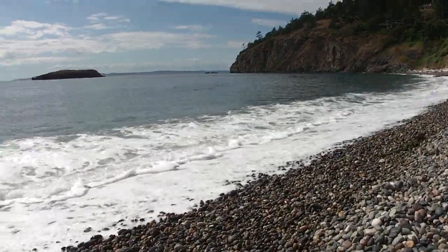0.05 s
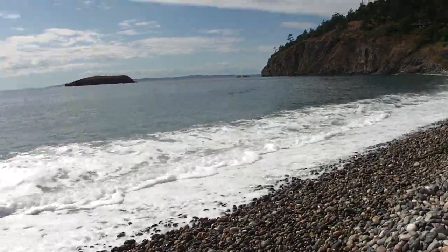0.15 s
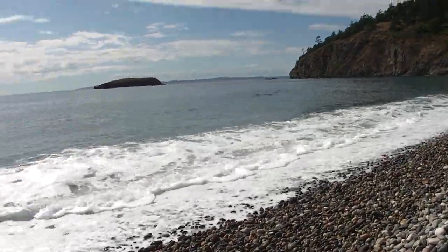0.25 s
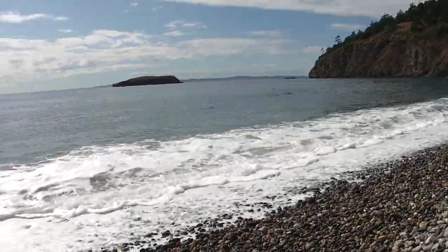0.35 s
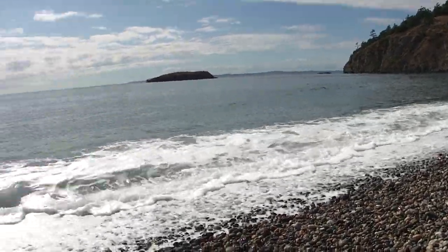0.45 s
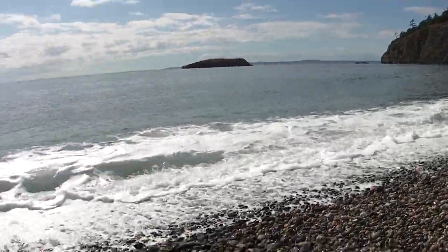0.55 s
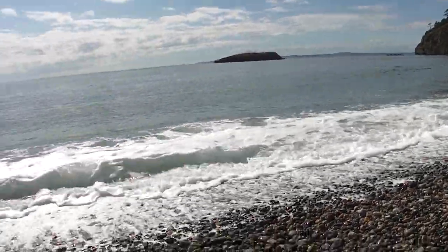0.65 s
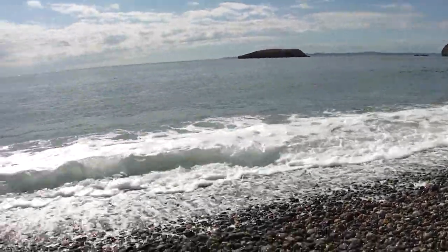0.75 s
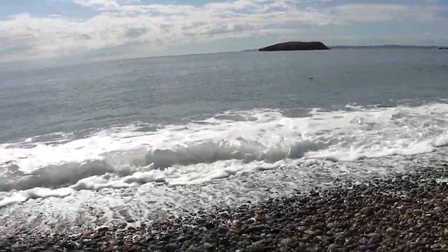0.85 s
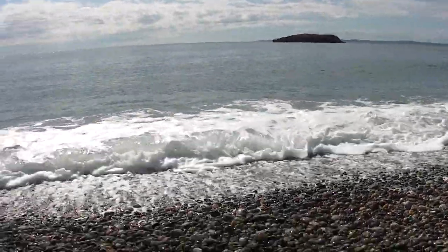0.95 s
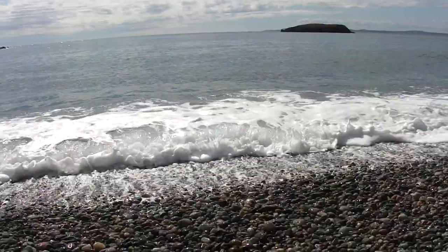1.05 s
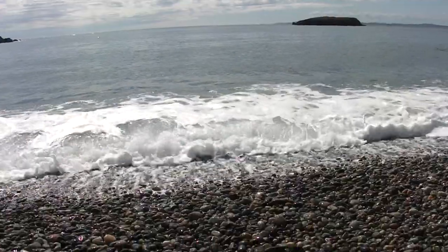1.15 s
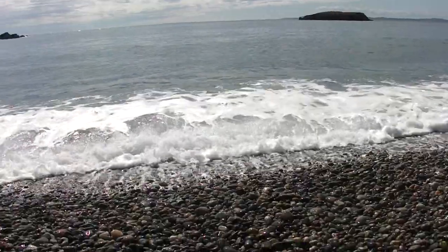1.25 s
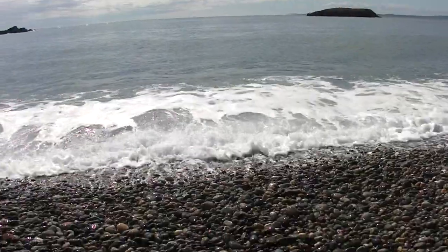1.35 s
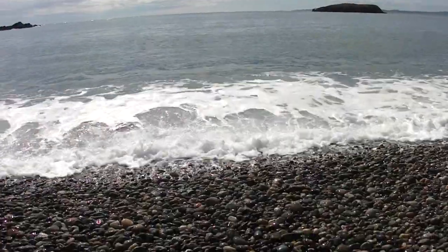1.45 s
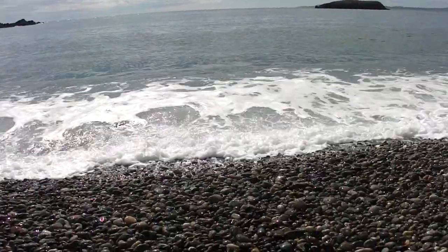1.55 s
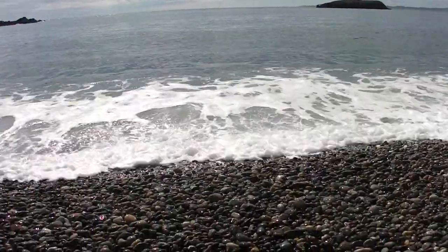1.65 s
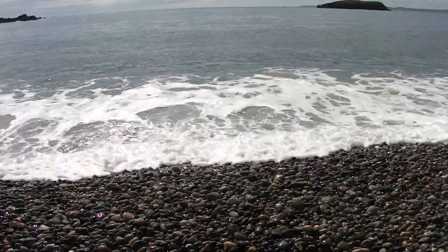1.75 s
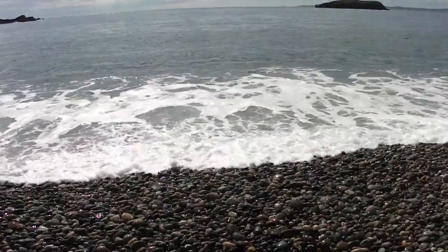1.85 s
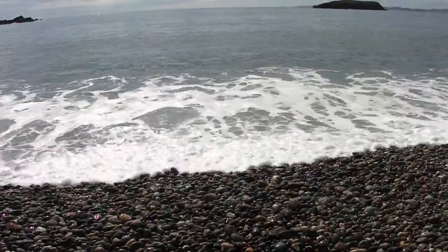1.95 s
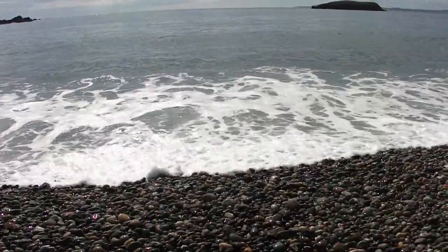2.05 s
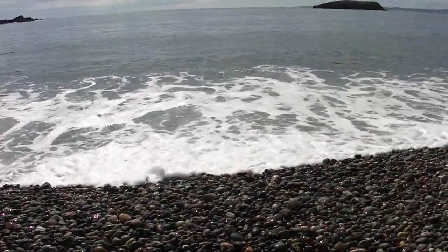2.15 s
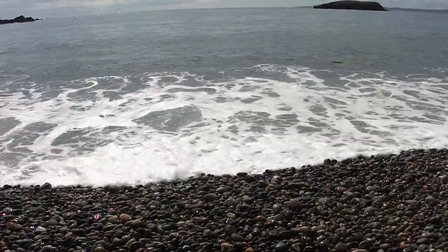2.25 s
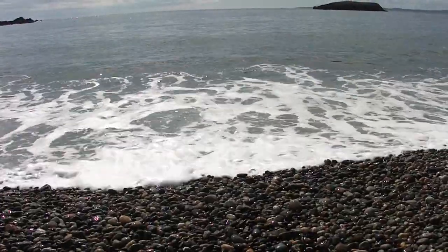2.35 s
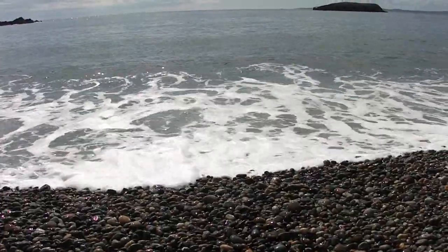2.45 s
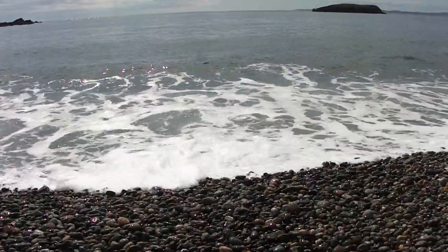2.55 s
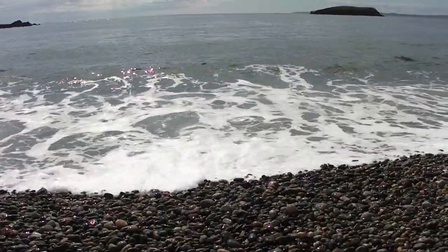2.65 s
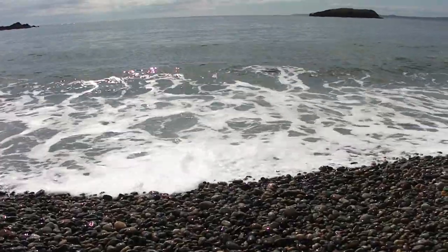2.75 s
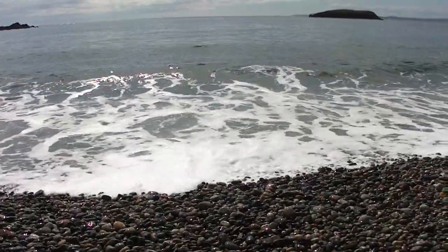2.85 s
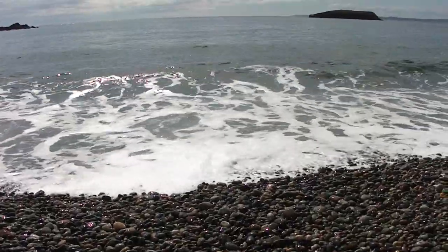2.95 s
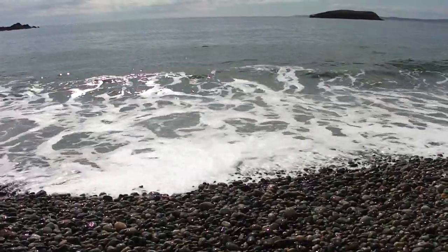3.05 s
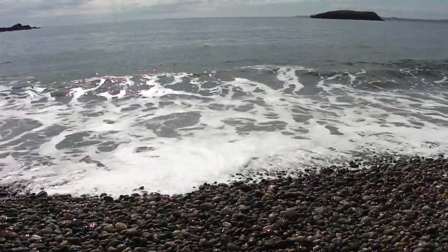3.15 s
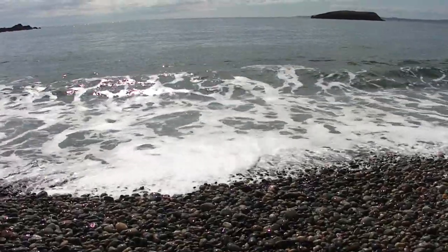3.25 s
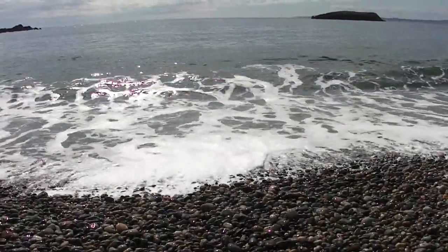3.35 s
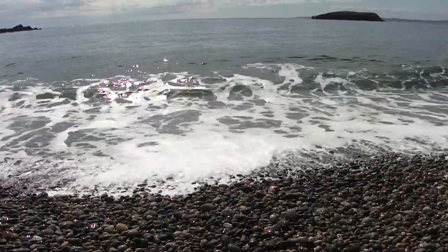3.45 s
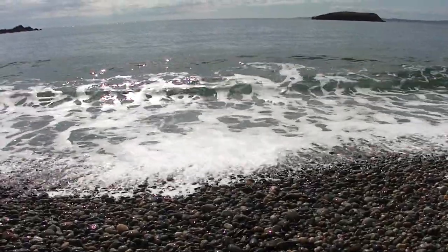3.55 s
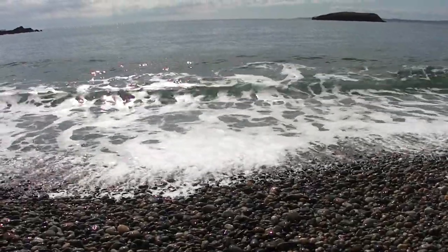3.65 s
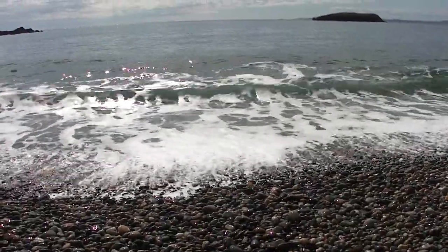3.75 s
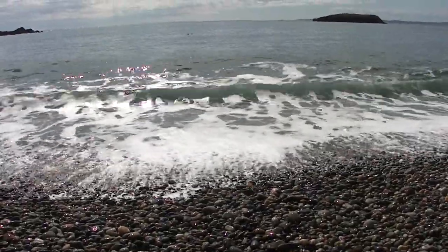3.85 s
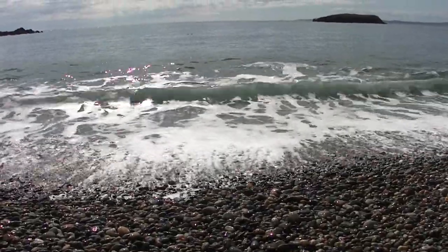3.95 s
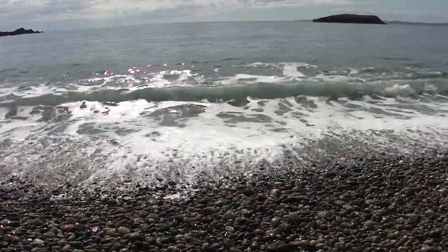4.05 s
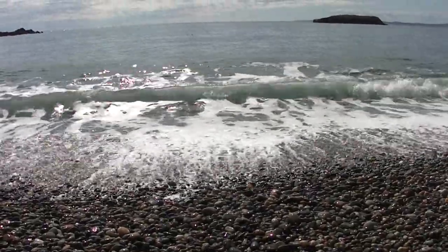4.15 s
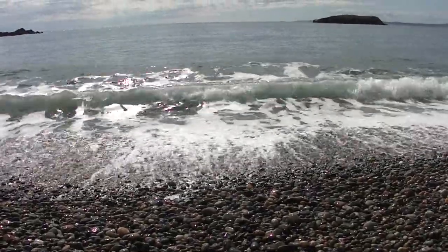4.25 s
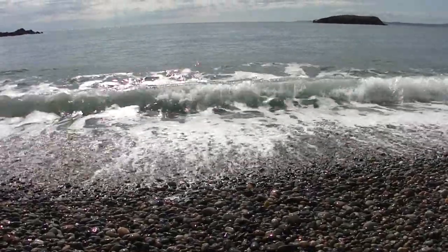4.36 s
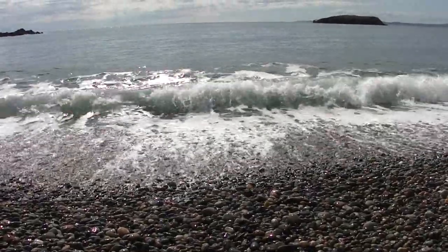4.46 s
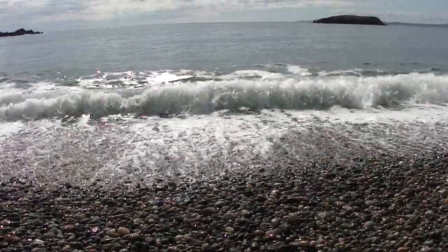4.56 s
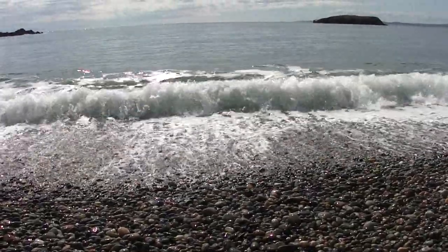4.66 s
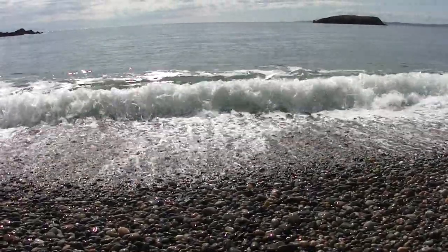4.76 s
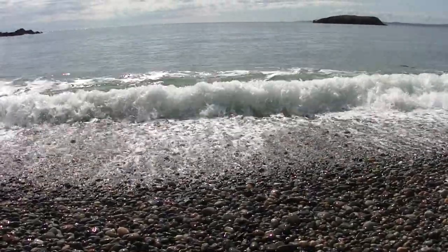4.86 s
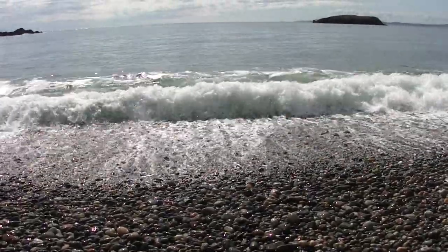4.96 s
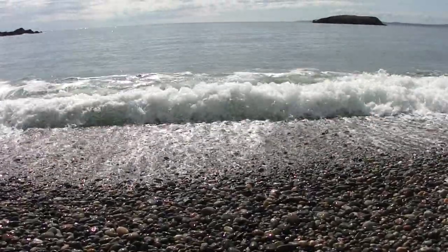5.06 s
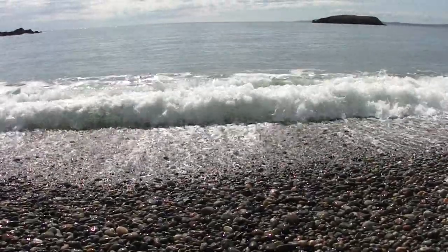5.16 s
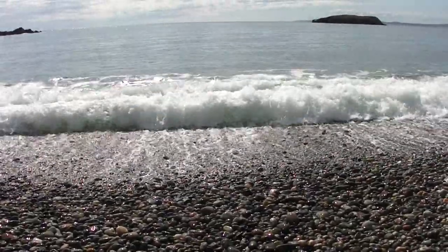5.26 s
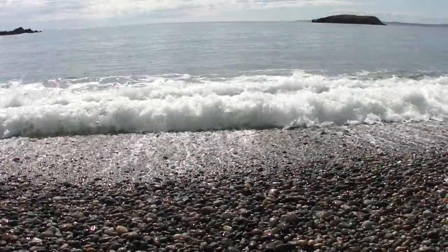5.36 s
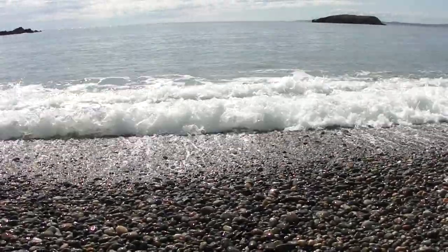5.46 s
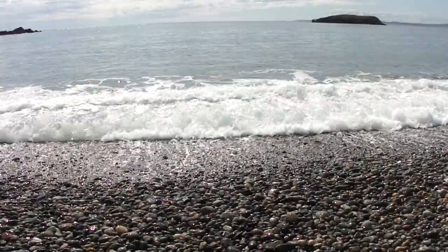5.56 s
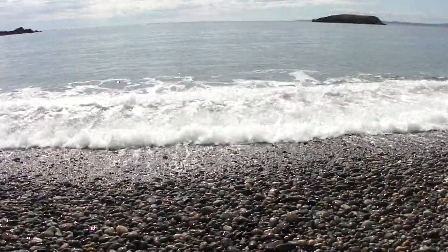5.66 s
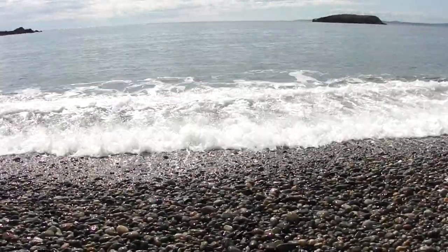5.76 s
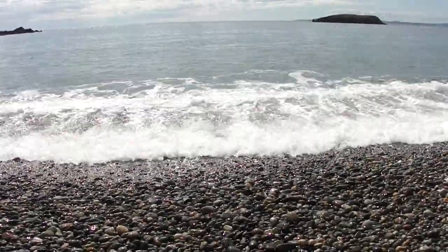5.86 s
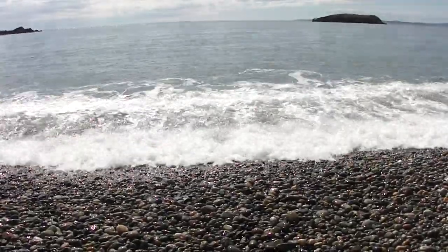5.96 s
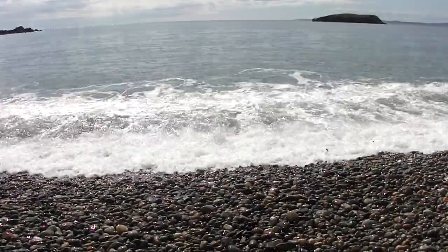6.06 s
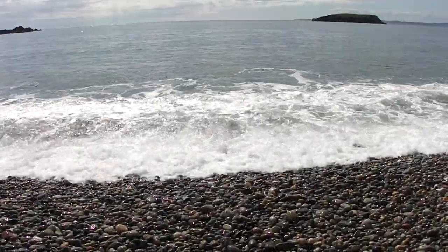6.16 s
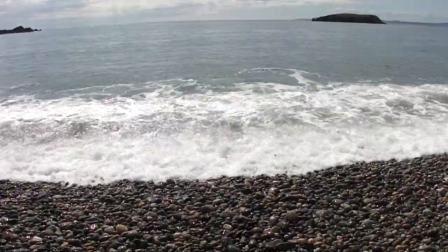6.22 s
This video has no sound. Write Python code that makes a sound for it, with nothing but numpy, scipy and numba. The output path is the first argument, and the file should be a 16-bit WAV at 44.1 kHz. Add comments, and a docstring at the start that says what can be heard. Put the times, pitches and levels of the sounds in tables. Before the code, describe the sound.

Outdoors on a pebble beach, near the waterline, with a small stereo microphone exposed to wind. From 0 to 1.4 s, low irregular gusts thump, flap and slap the microphone, shifting between sides, over a splashy wash and pebbly backwash; a small wave breaks around 1 s and runs up the stones, with a few knocks near 1.27 s. From 1.5 to 3.2 s it fades into thin fizzing foam, faint surf and isolated stone clicks, with only slight wind puffs. Around 3.3-3.45 s stones clack in a quick cluster, and hard wind slaps return until about 4 s as water drags hissing through shingle. At about 4.1 s a bigger wave breaks, bright and splashy, then tumbles in with uneven surges and a fuller gulping roar; two stones knock around 5.3 s. Near 6 s it washes up the pebbles and begins to ease.

```python
"""Gusts thump and slap at two microphone ports while a spent wave washes up a pebble beach and fizzes out;
stones knock in the water, then a last wave breaks and tumbles in. Surf is swarms of damped sines (bubbles,
drops) over filtered noise; stones are short tones and ticks; wind is thumps, noise and single push-pull
pulses, and each port's buffeting leaks inverted into the other channel."""
import sys
import numpy as np
from scipy import signal
from scipy.fft import rfft, irfft, next_fast_len
from scipy.io import wavfile
from scipy.ndimage import uniform_filter1d
from numba import njit

SR = 44100
rng = np.random.default_rng(int(sys.argv[2]) if len(sys.argv) > 2 else 0)


def inscribe(sig):
    """Save sig as 16-bit PCM at rate SR to the path in sys.argv[1].

    A 1-D sig is mono; a 2-D sig holds one channel per row.
    Samples are clipped to [-1, 1] before scaling.
    """
    pcm = np.round(np.clip(np.atleast_2d(sig).T, -1, 1) * 32767)
    wavfile.write(sys.argv[1], SR, pcm.astype(np.int16))


N = 277389
TIME = np.arange(N) / SR
PADDED = next_fast_len(N + SR // 10)
BINS = np.arange(PADDED // 2 + 1) * SR / PADDED  # Hz

# filter of splashing drops and pebble clicks: hz, gain_db
SPLASH_FILTER = [(400, -26), (900, -6.5), (1300, -1.5), (1800, -1), (2300, -2.5), (3000, -7), (4500, -15.5),
                 (8000, -68)]


def surf(roar_gain, splash_gain, spray_gain, hiss_gain,
         slosh_db=0.49, slosh_rate_hz=26, flutter_db=0.6, flutter_rate_hz=13):
    """Big air pockets gulp, bubble clouds roar, drops splash, spray and draining shingle hiss; foam fizzes."""
    # big air pockets against the roar: time_s, level_db
    churn = [(0, -8), (1.0, -1.5), (2.2, -8), (3.7, -4.5), (4.15, -2.5), (5.2, -3.5), (5.9, -8),
             (6.29, -16.5)]
    # fizz lingering on the wet stones: time_s, level_db
    fizz = [(0.8, -54), (1.5, -46), (3.0, -46), (3.6, -50)]
    # layer filters: hz, gain_db
    pocket_filter = [(30, -66), (70, -32), (130, -11.5), (220, -3), (400, 0), (520, 0.5), (750, 0.5),
                     (1400, -33)]
    roar_filter = [(150, -59), (400, -3), (600, -3), (800, 1.5), (1050, -0.5), (1400, -4), (2000, -9.5),
                   (4000, -35)]
    spray_filter = [(1500, -20), (3000, 5.5), (4500, 7), (6000, 5), (7500, -3.5), (9500, -10.5),
                    (11000, -23), (16000, -33)]
    hiss_filter = [(1500, 2), (3000, 5.5), (4500, 5.5), (6000, 4), (7500, -5.5), (9500, -16.5),
                   (16000, -62)]
    foam_filter = [(2000, -26), (4000, 0), (6000, 4.5), (8000, 4.5), (10000, -0.5), (11000, -9),
                   (16000, -8.5)]
    fresh_foam_db, foam_splash_share = -15, 0.13  # relative to roar gain; how far it follows the splash

    churn_db, = curves(churn)
    fizz_db, = curves(fizz)
    fresh_gain = roar_gain * (splash_gain / roar_gain) ** foam_splash_share * undb(fresh_foam_db)
    foam_gain = np.hypot(undb(fizz_db), fresh_gain)

    pockets = water(swarm(1200, 122.5, 895, 5.6, 1.3, 0.072), pocket_filter, blur_db=5.0)
    roar = water(swarm(2200, 416, 1760, 10.9, 2.17, 0.43), roar_filter, blur_db=8.5)
    splash = water(swarm(4000, 1074, 4620, 6.1, 1.8, 0.044), SPLASH_FILTER, blur_db=6.5)
    spray = water(swarm(6000, 3030, 12600, 14.0, 1.8, 0), spray_filter, blur_db=7.0)
    hiss = water(swarm(4000, 3180, 10200, 5.5, 2.8, 0), hiss_filter, blur_db=-0.5)
    foam = water(swarm(3900, 3520, 15500, 27, 1.8, 0.1), foam_filter, blur_db=5.5) * foam_gain

    pockets = pockets * roar_gain * undb(churn_db + 1.0)
    roar = roar * roar_gain * undb(1.0)
    splash = splash * splash_gain * undb(4.5)
    spray = spray * spray_gain * undb(12.0)
    hiss = hiss * hiss_gain * undb(12.0)

    # splash and spray flutter independently; all but the foam sloshes together
    splash = splash * undb(flutter_db * walk(flutter_rate_hz))
    spray = spray * undb(flutter_db * walk(flutter_rate_hz))
    slosh = undb(slosh_db * walk(slosh_rate_hz))
    return (pockets + roar + splash + spray + hiss) * slosh + foam


def sea():
    """Gains of roar, splash, spray, backwash flow and its hiss; powers of all moving water add."""
    # waves, the first already spent; levels before layer trims: breaks_s, run_s, splash_db, roar_db
    waves = [(-0.34, 0.1, -18.5, -34), (0.985, 0.35, -22.5, -29.5), (4.14, 1.84, -21, -18)]
    # crest stretches falling at once; levels before layer trims: lands_s, roar_db, splash_db, spray_db
    surges = [(0.105, -35, -28, -51), (4.085, -30, -32, -42), (4.28, -34, -24, -35), (4.42, -27, -31, -37),
              (4.89, -24, -35, -48), (5.18, -42, -27, -48), (5.84, -22.5, -42, -40), (6.09, -22, -42, -48)]
    # water dragging back through pebbles; before trims: full_flow_s, length_s, splash_db, hiss_db
    drags = [(0.373, 0.32, -27.8, -42), (3.317, 0.11, -35, -39), (3.84, 0.22, -33, -36.5)]
    drag_roar_db = -13  # relative to its splash
    far_roar_db, far_splash_db, far_spray_db = -42, -44, -55  # surf further along the beach

    roar, splash, spray = together([wave(*row) for row in waves] + [surge(*row) for row in surges])
    drag, hiss = together([backwash(*row) for row in drags])
    roar = np.hypot(together([roar, drag * undb(drag_roar_db)]), undb(far_roar_db))
    splash = np.hypot(together([splash, drag]), undb(far_splash_db))
    spray = np.hypot(spray, undb(far_spray_db))
    return roar, splash, spray, drag, hiss


def wave(breaks_s, run_s, splash_db, roar_db):
    """Gains of one wave: it topples, runs in as splash turns to roar, climbs the stones and drains."""
    break_db_per_s, collapse_db_per_s = 39, 42
    splash_sag_db, roar_growth_db, spray_growth_db = 5, 4.5, 1  # over the run
    swash_s, drain_db_per_s = 0.59, 16
    shingle_swell_db, shingle_swell_s = 0.3, 0.035
    crest_spray_db, swash_splash_db = -13, -14  # spray relative to splash; splash relative to roar
    spray_lag_s = 0.06

    progress = np.clip((TIME - breaks_s) / run_s, 0, 1) ** 2
    climb = np.clip((TIME - breaks_s - run_s) / shingle_swell_s, 0, 1)
    crest = swell(breaks_s, run_s, break_db_per_s, collapse_db_per_s)
    crest = crest * undb(splash_db - splash_sag_db * progress)
    roar = swell(breaks_s, run_s + swash_s, break_db_per_s, drain_db_per_s)
    roar = roar * undb(roar_db - roar_growth_db * (1 - progress) + shingle_swell_db * climb)
    spray = np.interp(TIME - spray_lag_s, TIME, crest)
    spray = spray * undb(crest_spray_db + spray_growth_db * progress)
    return roar, np.hypot(crest, roar * undb(swash_splash_db)), spray


def surge(lands_s, roar_db, splash_db, spray_db):
    """Gains of roar, splash and spray of one stretch of crest that comes down at once."""
    fall = swell(lands_s, length_s=0.012, rise_db_per_s=200, fall_db_per_s=100)
    return fall * undb(roar_db), fall * undb(splash_db), fall * undb(spray_db)


def backwash(start_s, length_s, splash_db, hiss_db):
    """Gains of water that gathers down the slope and is cut off; its hiss drains more slowly."""
    splash = swell(start_s, length_s, rise_db_per_s=26, fall_db_per_s=106)
    hiss = swell(start_s, length_s, rise_db_per_s=26, fall_db_per_s=58)
    return splash * undb(splash_db), hiss * undb(hiss_db)


def stones(upper_ratio=1.57, upper_db=-3, rebound_s=0.0068, rebound_db=-9,
           knock_db=-1.0, lowest_hz=620, crack_db=-15, crack_s=0.0017):
    """Each stone cracks, rings with two short tones and falls back once; too small to radiate bass."""
    # stones knocked together by the water; level before trim: start_s, level_db, pitch_hz, t60_s
    knocks = [(1.2645, -10, 760, 0.011), (1.2687, -7.5, 1080, 0.018), (1.273, -12, 1170, .012),
              (2.531, -14, 730, 0.012), (2.794, -11.5, 1560, 0.0045), (2.928, -19, 3360, 0.01),
              (2.968, -21, 1410, 0.013), (3.235, -13, 1050, 0.023), (3.3064, -12, 2030, 0.012),
              (3.310, -17, 1340, 0.022), (3.352, -11.5, 1890, 0.014), (3.365, -14, 1770, 0.025),
              (3.392, -8.5, 1270, 0.0071), (3.403, -11, 1410, 0.0073), (3.4376, -8, 1400, 0.0074),
              (5.298, -7, 1230, .01), (5.372, -5, 1250, .01)]
    s, db, hz, t60 = np.transpose(knocks)
    ahead = np.zeros(len(s))
    lower = rings(s, hz, t60, undb(db), 0., ahead)
    upper = rings(s, hz * upper_ratio, t60 / 2, undb(db + upper_db), 0., ahead)
    rebound_at = s + rebound_s * (.5 + rng.random(len(s)))
    rebound = rings(rebound_at, hz, t60 / 2, undb(db + rebound_db), 0., ahead)
    crack = ticks(s, db + crack_db, crack_s)
    return undb(knock_db) * bass_cut(lower + upper + rebound + crack, lowest_hz)


def shingle(drag_gain, splash_gain, dragged_db=-10, struck_db=-13, settling_db=-48, grit_db=-4, spatter_db=-9.0):
    """Pebbles rattle and tick where backwash drags them or water falls on them; a few keep settling."""
    clicks = water(swarm(300, 930, 3360, 13, 3.6, 0), SPLASH_FILTER, blur_db=-23)
    moved = together([drag_gain * undb(dragged_db), splash_gain * undb(struck_db)])
    rattle = clicks * np.hypot(moved, undb(settling_db))
    return rattle + spatter() * together([drag_gain * undb(grit_db), splash_gain * undb(spatter_db)])


def spatter(rate_hz=130, spread_db=4.5, decay_s=0.0046):
    """An uneven patter of sharp ticks: many faint, a few strong."""
    when, strength = rng.random((int(rate_hz * N / SR), 2)).T
    return unit(ticks(when * N / SR, -spread_db * np.log(strength + 1 / 50), decay_s))


def ticks(s, db, decay_s):
    """Stone or spatter on stone: very short bursts of bright noise."""
    # filter of the ticks: hz, gain_db
    grit_filter = [(600, -20), (1200, 2.5), (2300, 6.5), (4000, 4.5), (7000, -15.5), (11000, -46)]
    hits = np.bincount((s * SR).astype(int), undb(db), N)
    envelope = signal.lfilter([1], [1, -np.exp(-1 / (decay_s * SR))], hits)
    return envelope * water(0, grit_filter, blur_db=0)


def ports(beach):
    """Two close ports hear long waves alike and short ones differently; the surf is stronger on the left."""
    # the beach at the two ports: hz, likeness_0_to_1, left_minus_right_db
    port_likeness = [(100, 0.94, 2.5), (500, 0.99, 3.5), (1140, 0.99, 5), (1560, 0.73, 4.5),
                     (2100, 0.88, 4), (4000, 0.65, 2), (6500, 0.41, 1.5), (10000, 0.14, 1.1), (15000, 0, 1)]
    likeness, left_db = spectra(port_likeness)
    likeness = np.clip(likeness, -1, 1)
    mid, side = shape(beach, np.sqrt([1 + likeness, 1 - likeness]) / np.sqrt(2))
    return shape(np.array([mid + side, mid - side]), pan(left_db))


def wind(strong_db=-16, wind_db=3.5, slap_db=0.25, cut_hz=138, top_hz=850, deepest_hz=72, ceiling=0.8, leak=0.38):
    """Each port is buffeted by its own eddies, and shows up inverted and weaker in the other channel."""
    # gusts; level before trim, lean is half the left-right force ratio: start_s, length_s, level_db, lean_db
    gusts = [(0.023, 0.46, -19, 5), (0.572, 0.14, -18, -3.5), (0.813, 0.14, -23.5, 12),
             (0.974, 0.42, -21.5, -1), (1.94, 0.1, -29.5, -20), (2.136, 0.11, -30.5, -18),
             (2.707, 0.025, -31, -17), (3.417, 0.18, -16, -16), (3.624, 0.17, -23.5, 0),
             (3.787, 0.15, -19.5, -6), (4.073, 0.058, -21, -23), (4.353, 0.31, -28, -12),
             (4.68, 0.15, -24, -6)]
    parts = []
    for s, length_s, db, lean_db in gusts:
        sides = unit(pan(2 * lean_db)) / np.sqrt(2)
        gust = swell(s, length_s, rise_db_per_s=274, fall_db_per_s=216) * undb(db)
        parts.append(np.outer(sides, gust))
    force = together(parts)
    speed = np.clip(np.sqrt(together(force) / undb(strong_db)), 0, 1)  # relative, 0-1
    buffeting = np.array([eddies(speed), eddies(speed)]) * force * undb(wind_db)
    pressure = bass_cut(buffeting, cut_hz) + undb(slap_db) * slaps(force)
    # the microphone rounds the hardest blows
    rounded = ceiling * np.tanh(pressure / ceiling)
    band = 1 / np.sqrt((1 + (BINS / top_hz) ** 8) * (1 + (deepest_hz / (BINS + 1)) ** 4))
    rumble = shape(rounded, band)
    return rumble - leak * rumble[::-1]


def eddies(speed, calm_hz=140, blur_hz=400, blur_db=-8):
    """Pressure on one port: distinct thumps over a blur of eddies that is deep in slow air."""
    deep = unit(shape(rng.standard_normal(N), 1 / np.sqrt(1 + (BINS / calm_hz) ** 6)))
    bright = unit(shape(rng.standard_normal(N), 1 / np.sqrt(1 + (BINS / blur_hz) ** 6)))
    blur = 2 * (1 - speed) * deep + speed * bright
    return (puffs(speed) + undb(blur_db) * blur) / np.sqrt(2)


def puffs(speed, rate_hz=68, scatter=0.3985, slow_hz=170, fast_hz=325, cycles=4.5, size_db=2.5):
    """Eddies strike one port in an uneven train of short thumps; faster air makes them higher."""
    late, pitch, size = rng.standard_normal((int(rate_hz * N / SR), 3)).T
    s = np.abs(np.arange(len(late)) + scatter * late) / rate_hz
    hz = slow_hz + (fast_hz - slow_hz) * np.interp(s, TIME, speed)
    hz = hz * 2 ** (.3 * pitch)
    push = undb(size_db * size) * np.sign(late)
    return unit(rings(s, hz, cycles / hz, push, 0., np.zeros(len(s)))[0])


def slaps(force, cycles=0.59, zero_db_hz=355, db_per_octave=16.5):
    """The hardest eddies: each a push and pull of air on the port under more force; harder is quicker."""
    # slaps of air; level before trim and rounding: centre_s, level_db
    slap_events = [(0.046, -6), (0.066, -1.5), (0.136, -3), (0.154, -6), (0.194, -1.5), (0.236, 2),
                   (0.311, -0.5), (0.396, -1), (0.411, -0.5), (0.439, -3), (0.464, -2.5), (0.531, -4),
                   (0.542, -5), (0.562, -4), (0.661, -3), (0.676, -2), (0.690, 0), (0.742, 5),
                   (0.821, -6.5), (0.902, -9), (0.949, -7), (0.984, -8), (1.076, -5), (1.112, -9),
                   (1.150, -2), (1.240, -8), (1.360, -8), (1.946, -17), (2.032, -14), (2.719, -18),
                   (3.335, -9.5), (3.393, -9), (3.414, -7), (3.442, -2.5), (3.466, -0.5), (3.497, -4),
                   (3.509, 1.5), (3.531, -0.5), (3.558, -5), (3.578, -1), (3.594, 0), (3.602, -2),
                   (3.684, -8.5), (3.775, -6.5), (3.807, -7.5), (3.863, -8), (3.885, -5), (3.907, -9),
                   (3.988, -9)]
    out = np.zeros((2, N))
    for s, db in slap_events:
        port = np.argmax(force[:, int(s * SR)])
        turns = (TIME - s) * zero_db_hz * 2 ** (db / db_per_octave)
        near = np.abs(turns) < 2
        pulse = np.sin(2 * np.pi * turns[near]) * np.exp(-(turns[near] / cycles) ** 2)
        out[port, near] += undb(db) * pulse
    return out


def breeze(breeze_db=-58.5, wobble_db=5.6, lowest_hz=85, highest_hz=190):
    """Air rumbles faintly throughout: wavering band noise, drawn separately for the two ports."""
    band = signal.butter(2, [lowest_hz, highest_hz], "band", fs=SR, output="sos")
    rumble = unit(signal.sosfilt(band, rng.standard_normal((2, N))))
    return rumble * undb(breeze_db + wobble_db * walk(10.0))


def water(grains, colour, blur_db):
    """Near grains over the blur of countless far ones; beyond its filter table the sound dies away."""
    cloud = grains + undb(blur_db) * rng.standard_normal((2, N))
    ends = np.minimum(BINS / colour[0][0], 1) ** 2 / np.maximum(BINS / colour[-1][0], 1) ** 2
    return unit(shape(cloud, ends * undb(spectra(colour)[0])))


def swarm(rate_hz, lo_hz, hi_hz, cycles, spread_db, glide):
    """Bubbles or drops at random times, pitches and places: many faint, a few strong."""
    when, pitch, strength, life, place = rng.random((int(rate_hz * N / SR), 5)).T
    hz = np.minimum(lo_hz * (hi_hz / lo_hz) ** pitch, SR / 2)
    size = undb(-spread_db * np.log(strength + 1 / 200)) * hz / hi_hz
    t60 = cycles * (.5 + life) / hz
    return unit(rings(when * N / SR, hz, t60, size, float(glide), 2 * np.pi * place))


@njit
def rings(starts, hz, t60, size, glide, angle):
    """Damped sines gliding up by a fraction as they fade; angle shares each between two channels."""
    out = np.zeros((2, N))
    for k in range(len(starts)):
        first, length = int(starts[k] * SR), int(t60[k] * SR) + 2
        turn = 2 * np.pi * hz[k] / SR
        z = size[k] + 0j
        p = np.exp(1j * turn - np.log(1000) / length)
        bend = np.exp(1j * turn * glide / length)
        a, b = np.cos(angle[k]), np.sin(angle[k])
        for i in range(first, min(first + length, N)):
            z *= p
            p *= bend
            out[0, i] += a * z.imag
            out[1, i] += b * z.imag
    return out


def swell(start_s, length_s, rise_db_per_s, fall_db_per_s):
    """Gain that rises to 1 at the start, holds and dies away."""
    before_s = np.maximum(start_s - TIME, 0)
    after_s = np.maximum(TIME - start_s - length_s, 0)
    return undb(-rise_db_per_s * before_s - fall_db_per_s * after_s)


def together(parts):
    """Joint gain of unrelated sounds: their powers add."""
    return np.sqrt(np.sum(np.square(parts), axis=0) + 1e-18)


def walk(rate_hz):
    """Smooth chance that changes about rate_hz times a second; rms 1."""
    hold = max(int(SR / rate_hz), 2)
    steps = np.repeat(rng.standard_normal(N // hold + 2), hold)
    return unit(uniform_filter1d(steps, hold)[rng.integers(hold):][:N])


def undb(db):
    """Decibels to gain."""
    return 10 ** (np.asarray(db) / 20)


def unit(x):
    """Scale to rms 1."""
    return x / np.sqrt(np.mean(x ** 2))


def pan(db):
    """Left and right gains for a level difference."""
    return undb(np.array([db, -db]) / 2)


def curves(table):
    """Each column of a timed table, at every sample."""
    s, *columns = np.transpose(table)
    return [np.interp(TIME, s, c) for c in columns]


def spectra(table):
    """Each column of a frequency table, at every bin, along log frequency."""
    hz, *columns = np.transpose(table)
    return [np.interp(np.log(BINS + 1), np.log(hz), c) for c in columns]


def shape(x, gain):
    """Filter with a gain per bin."""
    return irfft(rfft(x, PADDED) * gain, PADDED)[..., :N]


def bass_cut(x, hz):
    """High-pass, 18 dB an octave."""
    return signal.sosfilt(signal.butter(3, hz, "high", fs=SR, output="sos"), x)


def scene():
    """Surf and stones in front, wind on the microphone."""
    roar, splash, spray, drag, hiss = sea()
    beach = surf(roar, splash, spray, hiss) + shingle(drag, splash) + stones()
    return ports(beach) + wind() + breeze()


def record(dry, notch_width_hz=2200, dip_hz=12750, dip_width_hz=1250, dip_db=-30, top_hz=15800):
    """The camera hollows out the low treble with three notches, has a dip higher up and cuts the top."""
    # notch centres: hz
    notch_centres = [3010, 4010, 5010]
    off_centre = ((BINS - dip_hz) / dip_width_hz) ** 2
    gain = undb(dip_db * np.exp(-off_centre ** 2))
    for hz in notch_centres:
        gap = hz ** 2 - BINS ** 2
        gain = gain * gap / (gap + 1j * notch_width_hz * BINS)
    top_cut = signal.ellip(10, .2, 80, top_hz, fs=SR, output="sos")
    return signal.sosfilt(top_cut, shape(dry, gain))


dry = scene()
out = record(dry)
inscribe(out)
```